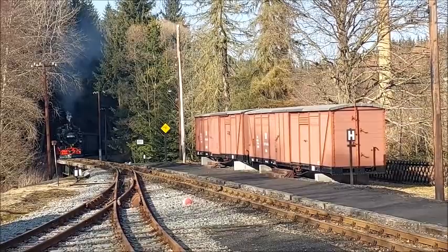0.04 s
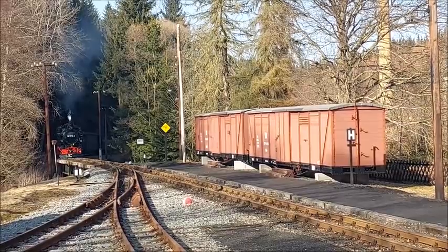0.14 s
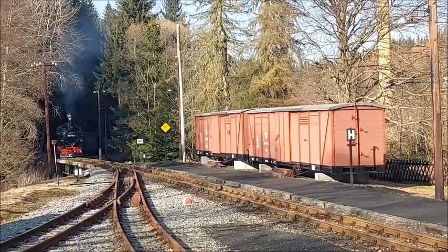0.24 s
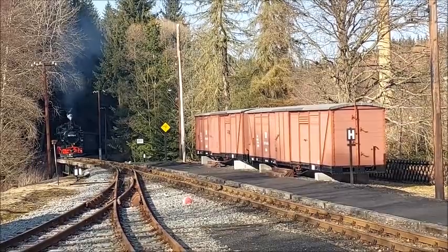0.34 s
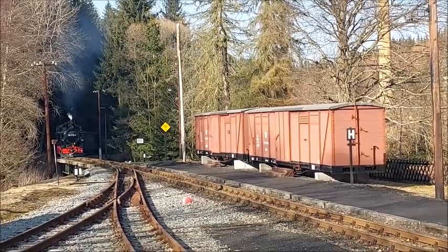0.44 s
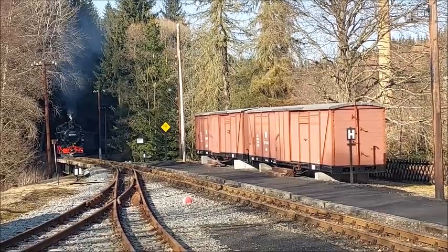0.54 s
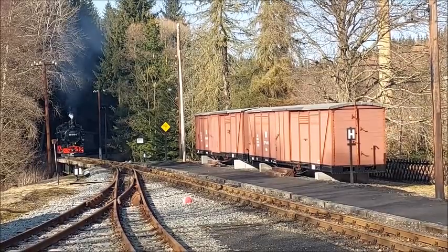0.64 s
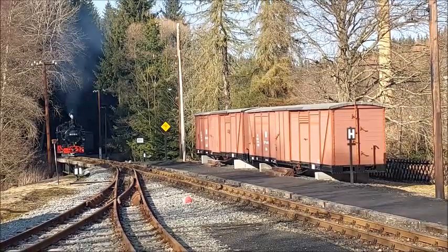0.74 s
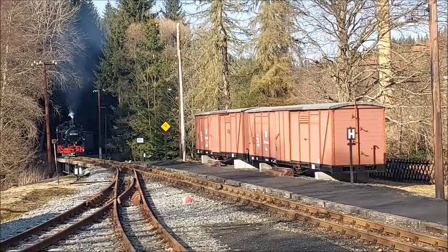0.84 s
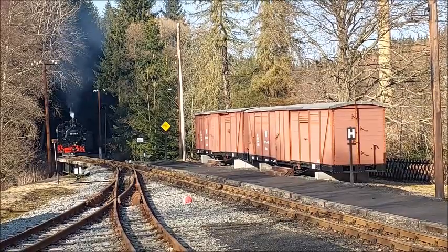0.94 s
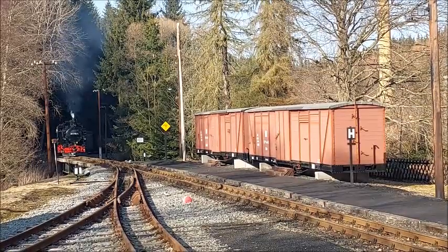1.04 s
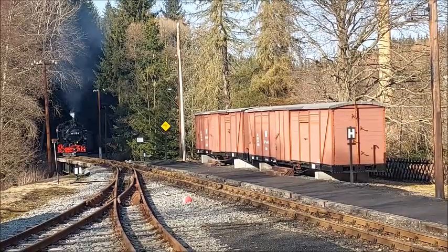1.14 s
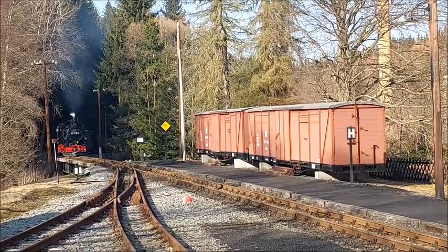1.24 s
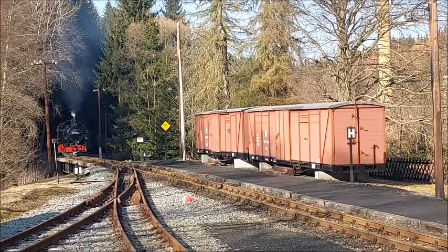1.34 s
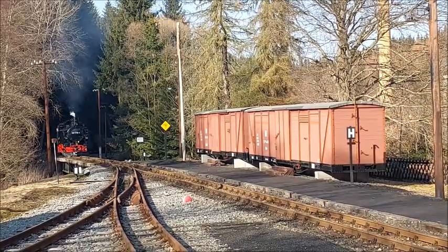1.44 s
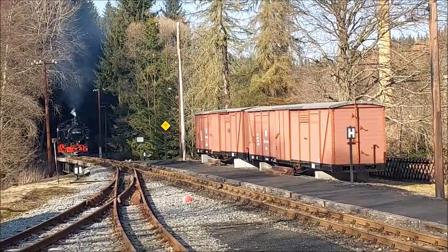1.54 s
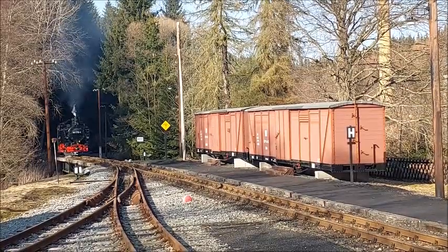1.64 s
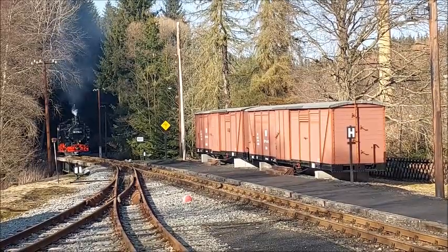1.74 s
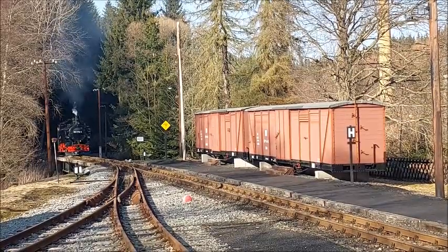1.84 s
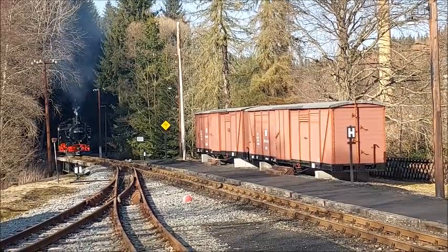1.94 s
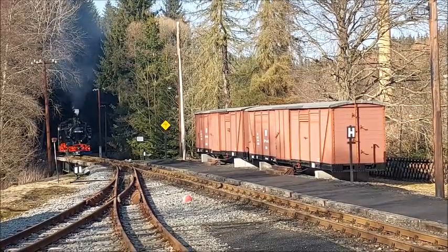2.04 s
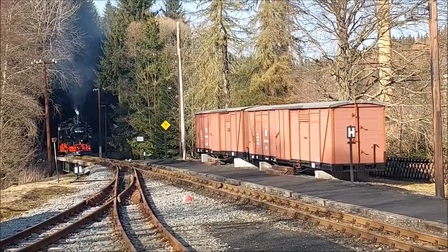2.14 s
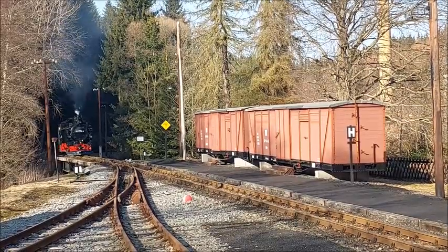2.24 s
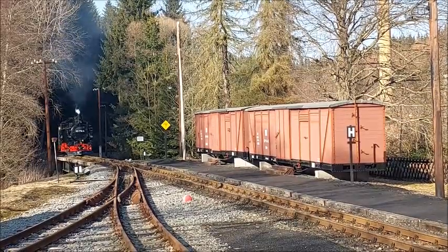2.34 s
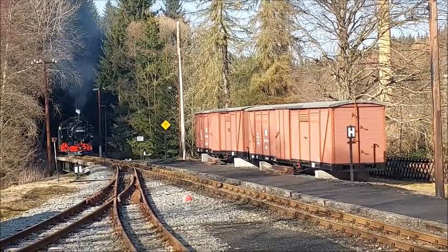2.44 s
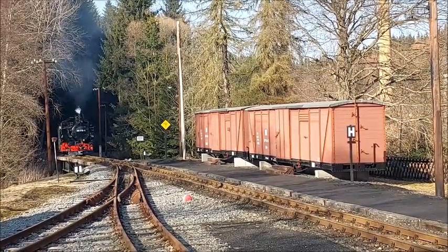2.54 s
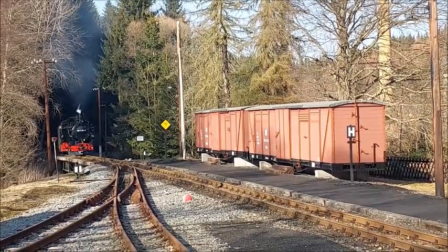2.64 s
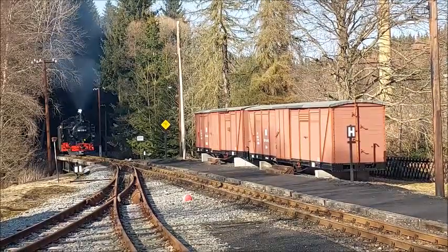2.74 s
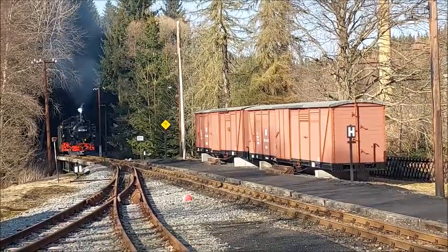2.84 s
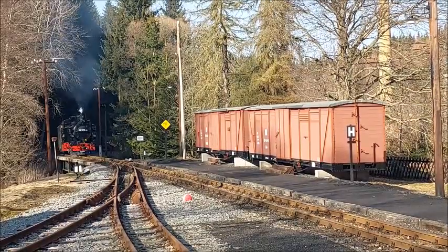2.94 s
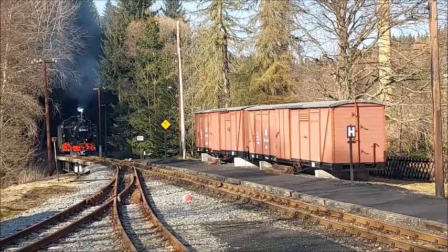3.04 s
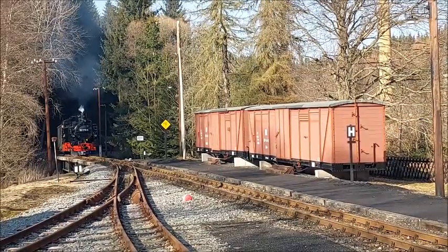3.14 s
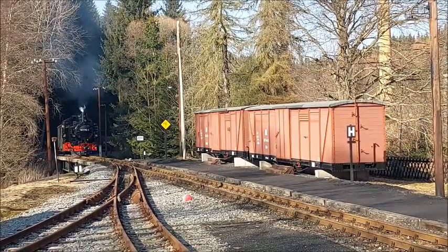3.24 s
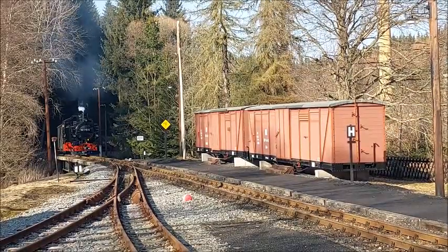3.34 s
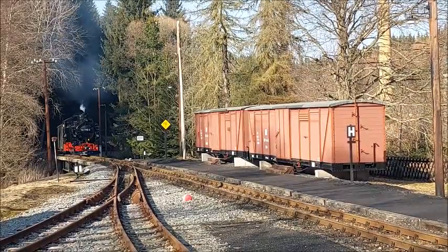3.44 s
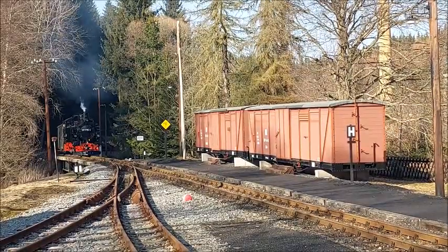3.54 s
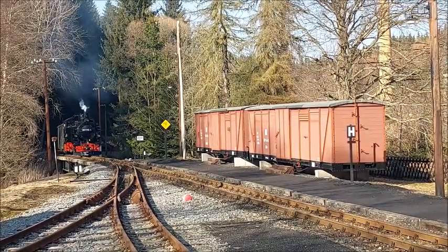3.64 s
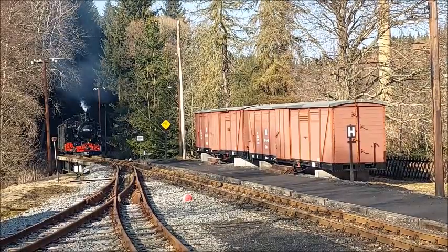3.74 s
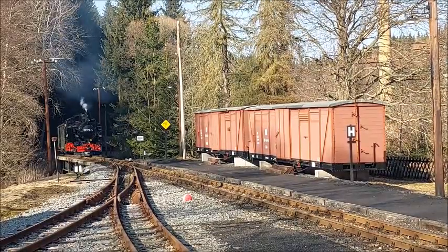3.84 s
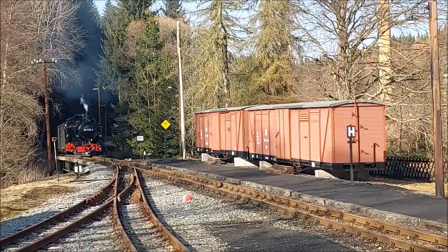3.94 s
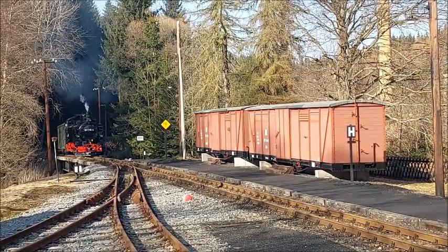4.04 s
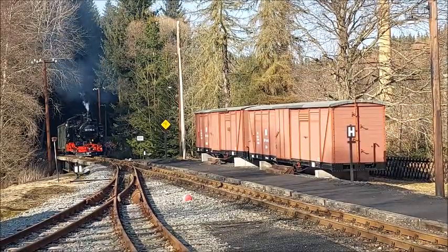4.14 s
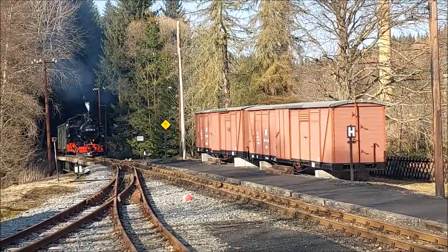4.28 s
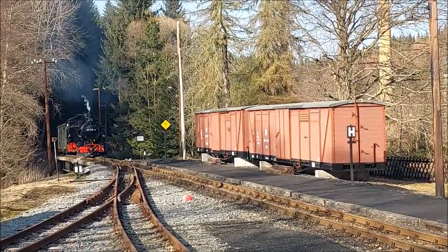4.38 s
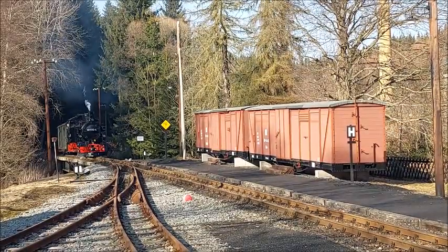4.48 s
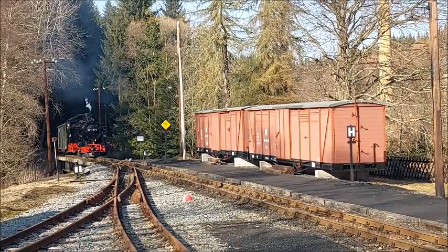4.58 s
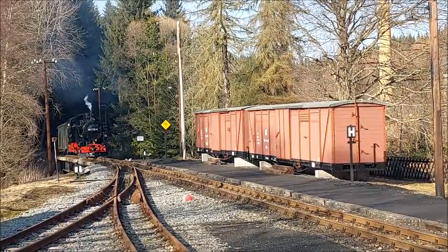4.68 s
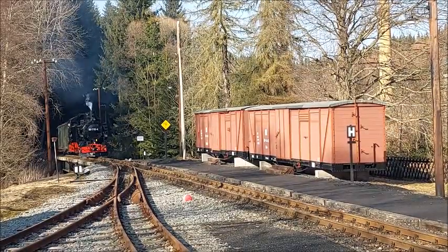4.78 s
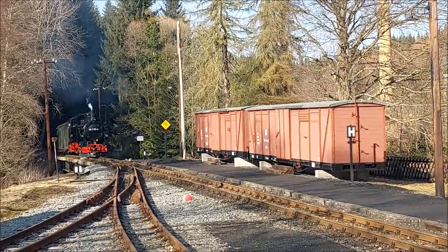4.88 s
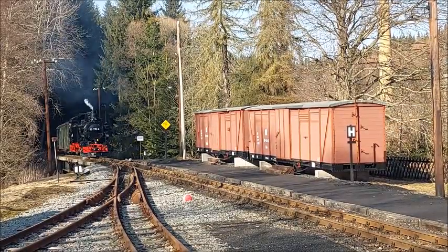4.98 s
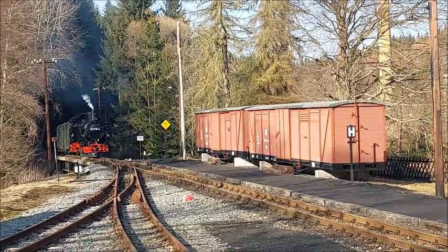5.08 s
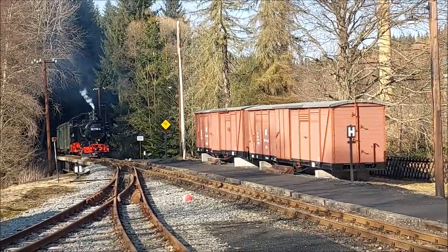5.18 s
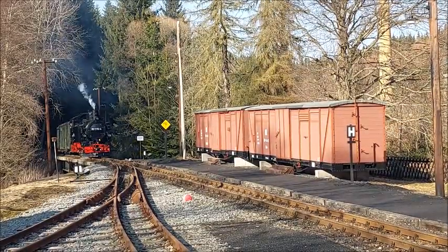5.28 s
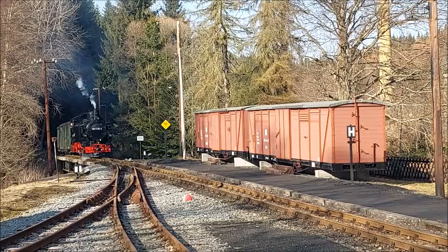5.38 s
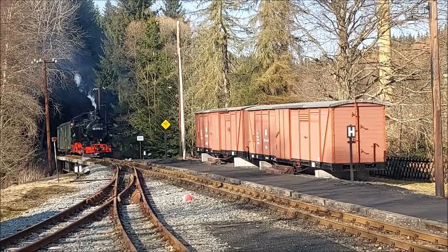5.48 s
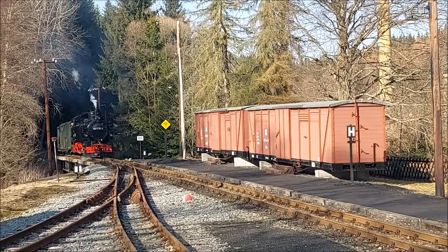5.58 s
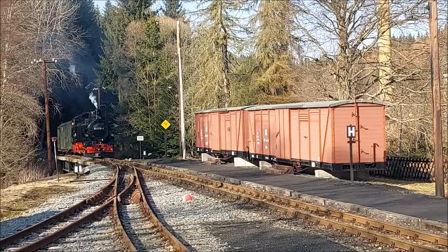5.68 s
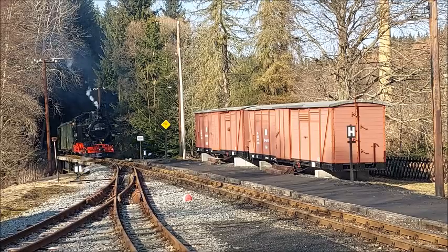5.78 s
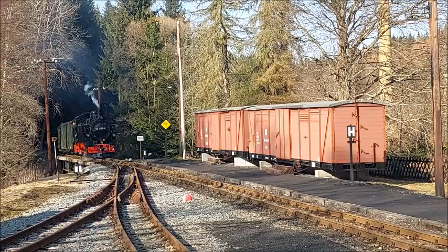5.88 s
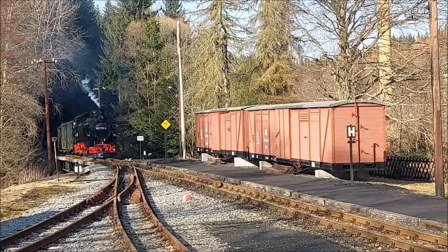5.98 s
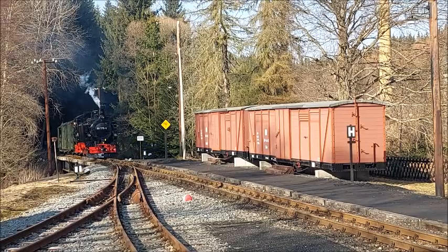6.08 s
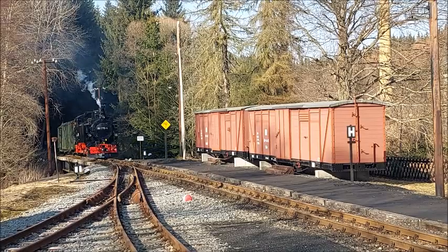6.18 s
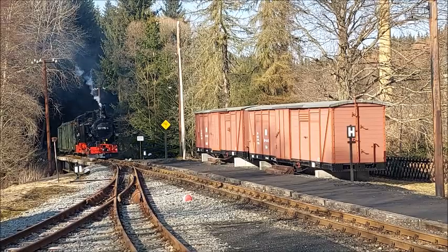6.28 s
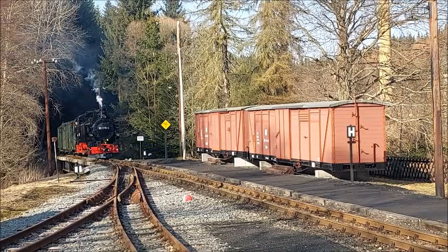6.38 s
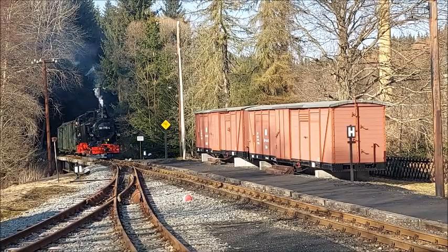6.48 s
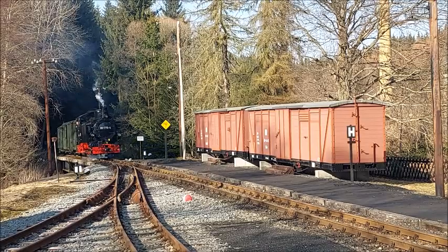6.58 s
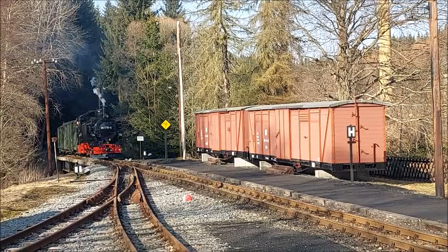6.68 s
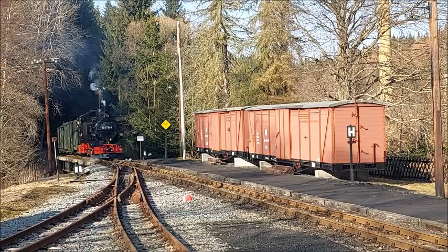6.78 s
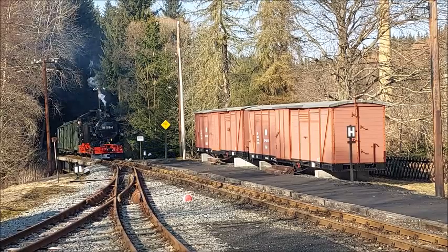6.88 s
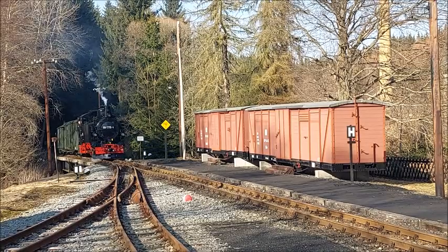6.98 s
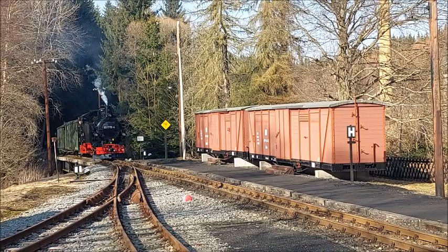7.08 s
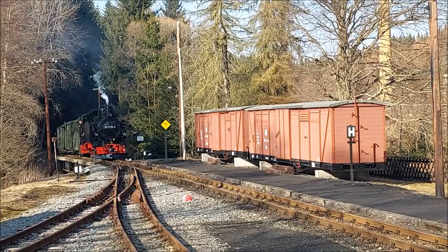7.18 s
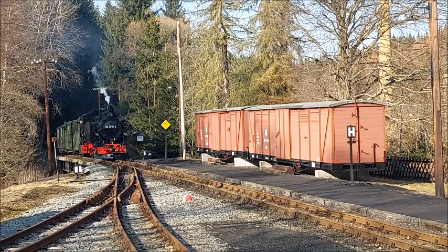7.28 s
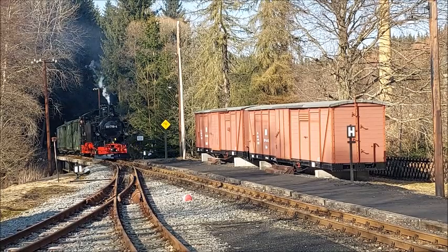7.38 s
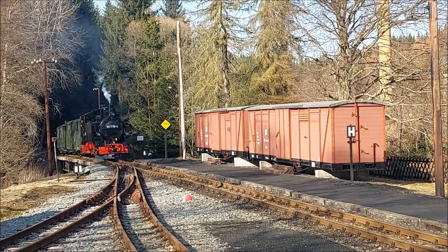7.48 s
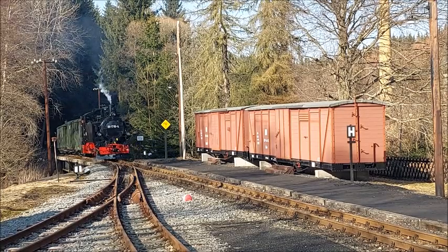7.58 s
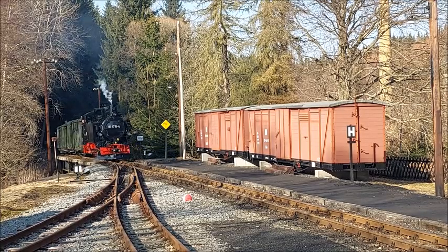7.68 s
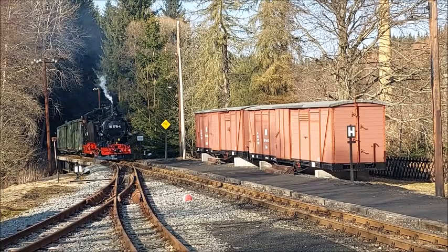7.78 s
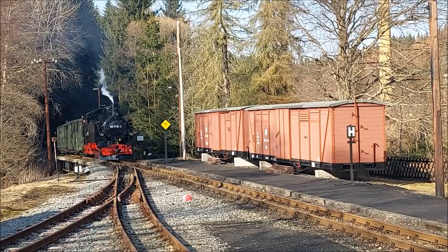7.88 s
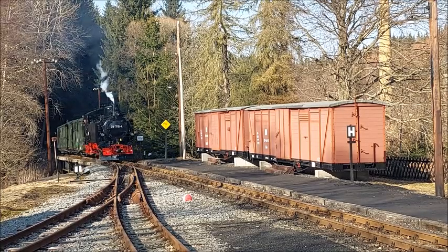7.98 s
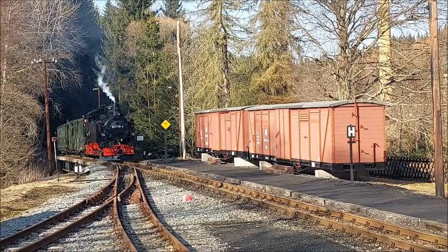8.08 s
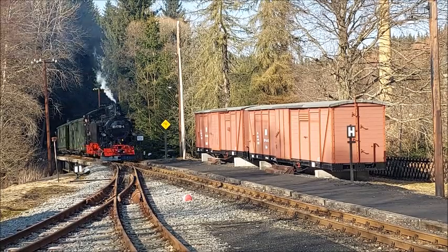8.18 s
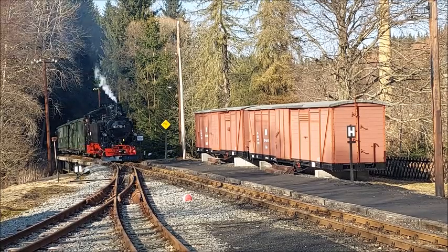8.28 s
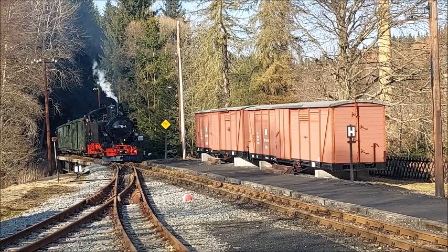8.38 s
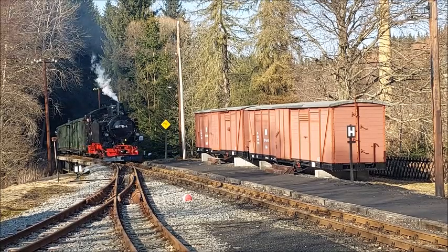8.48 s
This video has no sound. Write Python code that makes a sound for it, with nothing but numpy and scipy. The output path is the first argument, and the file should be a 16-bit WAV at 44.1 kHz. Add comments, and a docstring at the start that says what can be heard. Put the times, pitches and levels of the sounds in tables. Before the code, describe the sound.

Outdoors by a forest railway, a distant steam locomotive comes nearer, puffing a little over six beats a second. Soft, raspy chuffs gain body and boom, echoing dully off trees above a low rolling rumble and faint steam hiss. Close to the stereo microphone, a camera shutter fires three brief bursts, coupling gear knocks once, and late wind buffets thump.

```python
"""A steam locomotive works its way closer through a forest, a little over six exhaust beats a second.
Each beat is enveloped noise: a thump, a booming chimney, a rasp and a hiss; all but the hiss echo off the trees.
Beneath it the train rumbles, rolls and leaks steam as noise, and the engine drones in low sine partials.
Close by, a camera shutter fires in short bursts of tiny noise clicks, and coupling gear knocks once in damped sines.
Wind buffets thud on the microphone as low noise, and two faint rustles crackle near it."""
import sys
import numpy as np
from scipy import signal
from scipy.fft import rfft, irfft, next_fast_len
from scipy.io import wavfile
from scipy.ndimage import uniform_filter1d

SR = 44100
rng = np.random.default_rng(int(sys.argv[2]) if len(sys.argv) > 2 else 0)


def transcribe(signal):
    """Save signal, clipped to [-1, 1], as a 16-bit WAV file at the path in sys.argv[1]."""
    frames = np.atleast_2d(signal).T
    limited = np.clip(frames, -1, 1)
    pcm = np.round(limited * 32767).astype(np.int16)
    wavfile.write(sys.argv[1], SR, pcm)


N = 375732
TIME = np.arange(N) / SR
SIZE = next_fast_len(N, real=True)
FREQ = np.maximum(np.fft.rfftfreq(SIZE, 1 / SR), 1)

# Four exhaust beats to a turn of the driving wheels; the engine slows over the first turns, then holds its pace.
BEAT_COUNT = 54
FIRST_BEAT_S, TURN_S, FIRST_TURN_SHORTER_S, SLOWING_TURNS = 0.0852, 0.6337, 0.0303, 5
BEAT_SCATTER_DB, LENGTH_SCATTER = 0.65, 0.09  # chance from beat to beat
# Unevenly set valves, so every turn limps alike.
# Each row: lateness in seconds, boom offset in dB, rasp offset in dB, relative length.
VALVE_BEATS = [(-0.0002, 0.26, 0.37, 1.38), (0.0027, 0.05, 0.5, 1.42), (-0.0064, -1.5, -0.5, 1.22),
               (-0.0023, 0.7, -0.6, 1.16)]
# Strength of the blast as the engine works closer, before each layer's trim.
# Each row: time in seconds, boom level in dB, rasp level in dB.
BLAST = [(0.1, -40.5, -38.5), (0.85, -36, -33.5), (1.5, -30.5, -32.5), (1.999, -28, -31), (2.9, -30, -31.5),
         (3.45, -28, -32.5), (4.3, -26, -30.5), (5.9, -26.5, -31), (6.3, -22.5, -31.2), (7.1, -24.3, -31.5),
         (7.65, -20, -29.8), (8.0, -23, -31), (8.42, -21, -31)]
# Single beats that stand out. Each row: time in seconds, extra boom in dB, extra rasp in dB.
ACCENTS = [(0.537, 5, 0), (2.227, 1, 1.5), (4.445, -0.5, 1), (4.605, -1.5, 1), (5.077, -1.5, 3),
           (7.451, 0.5, 0), (8.41, 2.5, 2)]
# Spectra of the four layers of a beat. Each row: frequency in Hz, relative level per Hz in dB.
THUMP_COLOUR = [(25, -18), (45, -4), (68, 5), (95, 2), (130, -2), (155, -12), (180, -16), (215, 3.5),
                (280, -48)]
BOOM_COLOUR = [(35, -30), (65, -9.5), (125, -6), (165, -15), (215, -1), (310, -2), (450, -4), (560, -13.5),
               (800, -31)]
RASP_COLOUR = [(250, -13), (500, 3.5), (620, 4), (850, -2.5), (1050, -5.5), (1400, -13), (1550, -13.5),
               (2100, -14.5), (2400, -19.5), (2800, -21), (3200, -26), (5000, -30), (9000, -52)]
HISS_COLOUR = [(1800, -32), (3500, 4.5), (5000, 0), (7000, 3.5), (8400, -2), (9600, 1), (12500, 3),
               (15500, 0.5)]
# Resonances of chimney and smokebox. Each row: centre in Hz, width in Hz, lift in dB.
CHIMNEY = [(213, 4.7, 4), (242.7, 31, 6.5), (330, 8.9, 0), (374.6, 20.6, 5.5), (432, 19, 7.5),
           (1183, 15, 5.5), (1376, 71, 7.5), (1665, 6.7, 7.5), (1885, 59, 2)]
# Thump against the boom's strength. Each row: time in seconds, relative level in dB.
THUMP_LEVEL = [(0, -11), (2, -14), (4.2, -11), (5.4, -6), (6.5, -3.5), (7.4, -10), (8.52, -10)]
# Hiss against the rasp's strength, before trims. Each row: time in seconds, relative level in dB.
HISS_LEVEL = [(0, -20), (2, -26.5), (4.2, -25.5), (4.65, -19.5), (6.6, -20), (7.4, -22.5), (8.52, -20.5)]
# The rasp turns brighter for a few beats. One row: middle in seconds, half length in seconds, lift in dB.
BRIGHT_SPELL = (5.39, 0.21, 4.1)
START_DISTANCE_M, SPEED_M_PER_S = 130, 11
# Reflections close to the direct path, from ballast and bank.
# Each row: delay in seconds, share of the direct sound, wander of the delay in seconds.
GLANCES = [(.0009, 0.31, 0.00025), (.0042, 0.38, 0.001224)]

# Echoes from wagons and forest edge, before the treble cut. Each row: delay in seconds, level in dB.
ECHOES = [(.036, -15.5), (.062, -27), (.093, -24.5)]
FOREST_T60_S, FOREST_DB, FOREST_CUT_HZ = 0.94, -11.5, 620  # wash level is before the cut

# The rolling train, before each layer's trim.
# Each row: time in seconds, rumble level in dB, rolling noise level in dB, steam leak level in dB.
TRAIN = [(0.0, -51.5, -46.5, -64.5), (0.69, -45.5, -38.5, -57), (1.68, -43.5, -38.5, -60.5),
         (3.8, -40.5, -37.5, -59), (5.41, -37, -37, -61), (7.24, -38, -37.5, -59), (8.52, -37.5, -37, -57)]
# Spectra of the train's three layers. Each row: frequency in Hz, relative level per Hz in dB.
RUMBLE_COLOUR = [(18, -19), (30, -4), (45, -4.5), (62, 5), (90, 4), (125, 4.5), (145, -4), (175, -2.5),
                 (300, -60)]
ROLLING_COLOUR = [(100, -8), (170, -14.5), (245, 0), (420, -3), (520, -10), (800, -12), (1300, -21),
                  (1900, -17), (2700, -27.5), (5000, -36.5)]
LEAK_COLOUR = [(1200, 12), (2200, 7), (3200, 7.5), (4800, 6.5), (6500, 1), (8400, -5), (9700, -2.5),
               (12300, 1.5), (15500, -3)]

# Low drone from the engine. Each row: time in seconds, level in dB.
DRONE_LEVEL = [(0, -64), (1.2, -43), (3.1, -34.5), (3.9, -38.5), (5.2, -36.5), (6.5, -56), (8.52, -48)]
# Harmonics of the drone's cycle. Each row: multiple of the cycle rate, relative level in dB.
DRONE_PARTIALS = [(4, -7.5), (5, -3), (6, -4.5), (7, -8.5)]
DRONE_HZ = 20.55  # middle of the wandering cycle rate

# Bursts of the camera. Each row: start in seconds, number of exposures, relative level in dB.
BURSTS = [(0.092, 2, -3.5), (2.592, 3, 0), (4.652, 4, -1)]
EXPOSURE_GAP_S = 0.2007
# Contacts within an exposure, before the burst's level.
# Each row: seconds after its start, bright snap in dB, ring of the body in dB, decay constant in seconds.
SHUTTER = [(-.013, -49.5, -48, 0.0047), (-.001, -43.5, -39, .003), (.004, -61, -46.5, 0.0034),
           (0.044, -40.5, -54, 0.0054), (.074, -46.5, -50.5, 0.011)]
# Spectra of snap and ring. Each row: frequency in Hz, relative level per Hz in dB.
SNAP_COLOUR = [(1500, -12), (4500, 6), (5500, 9.5), (6500, -1.5), (11500, 3.5), (15500, 1)]
CAMERA_BODY_COLOUR = [(2000, -50), (3200, -5), (3850, 5), (4900, -6), (5600, -20), (9000, -34)]

KNOCK_S = 6.4416
# Modes of the knocking coupling gear. Each row: frequency in Hz, level in dB, 60 dB decay time in seconds.
KNOCK_MODES = [(880, -29, .025), (1090, -26, .022), (1380, -29, .02)]
# Spectrum of the scrape around the knock. Each row: frequency in Hz, relative level per Hz in dB.
SCRAPE_COLOUR = [(700, 1), (1200, 2), (2200, -14), (5200, -14), (9000, -25), (15000, -21)]

# Wind buffets. Each row: peak time in seconds, level in dB, half length in seconds.
BUFFETS = [(4.474, -29.5, 0.035), (5.397, -30, 0.01), (6.212, -46, .02), (6.75, -33, 0.024),
           (7.188, -17, 0.0097), (7.279, -27, 0.025)]
# Spectrum of wind on the microphone. Each row: frequency in Hz, relative level per Hz in dB.
EDDY_COLOUR = [(30, -13), (70, 8.5), (170, 4.5), (300, -35)]

# Faint dry rustles near the microphone. Each row: start in seconds, length in seconds, level in dB.
RUSTLES = [(0.15, 0.25, -62), (0.548, 0.8, -60.5)]
RUSTLE_ATTACK_S, RUSTLE_SAG_DB_PER_S, RUSTLE_RELEASE_S = 0.04, 12, 0.15

PORT_SPACING_S, LEFT_LEAD_S = 0.0005, 0.000085  # microphone ports, as travel times
CUTOFF_HZ = 15800


def exhaust():
    """The turbulent jet rasps and hisses; the slug of steam thumps, and the chimney booms and rings on."""
    rows = chuffs()
    _, boom_db, rasp_db, _ = rows.T
    thump_db, = in_time(THUMP_LEVEL)
    hiss_db, = in_time(HISS_LEVEL)
    distance_m = START_DISTANCE_M - SPEED_M_PER_S * TIME

    thump = evened(air_noise(colour(THUMP_COLOUR), scattered=0.72), window_s=0.039) * from_db(thump_db)
    thump *= beats(rows, boom_db, lag_s=-0.0011, rise_s=0.012, fall_s=0.039, linger_db=-47, linger_s=0.08)

    boom = evened(air_noise(colour(BOOM_COLOUR, CHIMNEY), scattered=0.097), window_s=0.028)
    boom *= beats(rows, boom_db + 0.5, lag_s=0.0061, rise_s=0.023, fall_s=0.023, linger_db=-55, linger_s=0.08)

    rasp = evened(air_noise(colour(RASP_COLOUR, CHIMNEY), scattered=0.29), window_s=0.031)
    rasp *= from_db(1.23 * drift(170))  # rough flutter
    rasp *= beats(rows, rasp_db + 2.0, lag_s=0, rise_s=0.02, fall_s=0.018, linger_db=-27.5, linger_s=0.12)
    rasp = along_the_line(rasp, distance_m, loss_db_per_m=0.0882)

    hiss = air_noise(colour(HISS_COLOUR), scattered=0.96) * from_db(hiss_db + 0.8 * drift(120))
    hiss *= beats(rows, rasp_db - 1.5, lag_s=-0.004, rise_s=0.025, fall_s=0.047, linger_db=-23.0, linger_s=0.08)
    return thump + boom + rasp, hiss


def chuffs():
    """The wheels time the beats; each row: crest in seconds before lags, boom dB, rasp dB, relative length."""
    beat = np.arange(BEAT_COUNT)
    turns = beat / len(VALVE_BEATS)
    late_s, boom_db, rasp_db, length = np.array(VALVE_BEATS)[beat % len(VALVE_BEATS)].T
    slowing = np.minimum(turns, SLOWING_TURNS)
    gained_s = FIRST_TURN_SHORTER_S * (slowing - slowing ** 2 / (2 * SLOWING_TURNS))
    s = FIRST_BEAT_S + TURN_S * turns - gained_s + late_s

    blast_s, blast_boom_db, blast_rasp_db = np.transpose(BLAST)
    boom_luck, rasp_luck, length_luck = rng.standard_normal((BEAT_COUNT, 3)).T
    boom_db = boom_db + np.interp(s, blast_s, blast_boom_db) + BEAT_SCATTER_DB * boom_luck
    rasp_db = rasp_db + np.interp(s, blast_s, blast_rasp_db) + BEAT_SCATTER_DB * rasp_luck
    for accent_s, more_boom_db, more_rasp_db in ACCENTS:
        nearest = np.argmin(np.abs(s - accent_s))
        boom_db[nearest] += more_boom_db
        rasp_db[nearest] += more_rasp_db
    return np.transpose([s, boom_db, rasp_db, length * np.exp(LENGTH_SCATTER * length_luck)])


def beats(rows, levels_db, lag_s, rise_s, fall_s, linger_db, linger_s):
    """The exhaust port opens, the cylinder blows down quickly, and the piston pushes out the rest."""
    power = np.zeros(N)
    for (s, *_, length), db in zip(rows, levels_db):
        near = slice(max(int((s - 0.1) * SR), 0), int((s + 0.3) * SR))
        t = TIME[near] - s - lag_s
        after = np.maximum(t, 0)
        opening = np.exp(-(np.minimum(t, 0) / rise_s) ** 2 / length)
        blowdown = np.exp(-after / (fall_s * length))
        pushed_out = from_db(linger_db) * np.exp(-after / linger_s)
        power[near] += (from_db(db) * opening * (blowdown + pushed_out)) ** 2
    return np.sqrt(power)


def along_the_line(x, distance_m, loss_db_per_m):
    """Wandering glancing reflections colour each beat anew; treble is lost with distance."""
    out = x
    for delay_s, share, wander_s in GLANCES:
        late = TIME - np.abs(delay_s + wander_s * drift(1.514))
        out = out + share * np.array([np.interp(late, TIME, channel) for channel in x])
    mellow = signal.sosfiltfilt(signal.butter(2, 1400, fs=SR, output="sos"), out)
    middle_s, half_s, bright_db = BRIGHT_SPELL
    spell_db = bright_db * np.exp(-((TIME - middle_s) / half_s) ** 2)
    air_loss_db = loss_db_per_m * (distance_m - np.mean(distance_m))  # against the mean distance
    return mellow + (out - mellow) * from_db(spell_db - air_loss_db)


def forest(x):
    """A few distinct echoes, and the dull wash scattered by the trunks."""
    t = TIME[:SR]
    wash = rng.standard_normal((3, SR)) * from_db(-60 * t / FOREST_T60_S) * (1 - np.exp(-t / 0.051))
    wash = wash[:2] * 1.1 + wash[2]  # the two sides share part of the wash
    response = from_db(FOREST_DB) * wash / np.sqrt(np.sum(wash ** 2) / 2)
    for delay_s, db in ECHOES:
        response[:, int(delay_s * SR)] += from_db(db)
    response = signal.sosfilt(signal.butter(1, FOREST_CUT_HZ, fs=SR, output="sos"), response)
    return signal.fftconvolve(x, response, axes=1)[:, :N]


def train():
    """Wheels rumble unevenly and roll on the rails, and steam leaks with a slight flutter."""
    rumble_db, rolling_db, leak_db = in_time(TRAIN)
    lumps_db = 4.0 * np.minimum(drift(24), 1.2)
    rumble = evened(air_noise(colour(RUMBLE_COLOUR), scattered=1.0), window_s=0.1)
    rumble = rumble * from_db(rumble_db + 0.5 + lumps_db)
    rolling = air_noise(colour(ROLLING_COLOUR, CHIMNEY), scattered=0.89)
    rolling = rolling * from_db(rolling_db - 3.0 + 2.5 * drift(37))
    leak = air_noise(colour(LEAK_COLOUR), scattered=0.93)
    leak = leak * from_db(leak_db + 3.5 + 0.8 * drift(90))
    return rumble + rolling + leak


def drone():
    """Low partials of one wandering cycle, each wavering in strength."""
    level_db, = in_time(DRONE_LEVEL)
    phase = 2 * np.pi * np.cumsum(DRONE_HZ * (1 + 0.02215 * drift(3.86))) / SR
    tone = np.zeros(N)
    for multiple, db in DRONE_PARTIALS:
        strength = from_db(db + 1.64 * drift(7.6))
        tone += strength * np.sin(round(multiple) * phase + rng.uniform(0, 2 * np.pi))
    return from_db(level_db) * rms_one(tone)


def camera():
    """Mirror and curtains make the same run of tiny contacts at each exposure."""
    snap, body = np.zeros((2, N))
    t = TIME[:SR // 10]
    exposures = [(s + k * EXPOSURE_GAP_S, db) for s, count, db in BURSTS for k in range(round(count))]
    for start, level_db in exposures:
        for delay, snap_db, body_db, decay in SHUTTER:
            at = int((start + delay) * SR)
            fade = from_db(level_db) * np.exp(-t / decay) * (1 - np.exp(-t / 0.00013))
            snap[at:at + len(t)] += from_db(snap_db) * fade
            body[at:at + len(t)] += from_db(body_db) * fade
    snaps = snap * air_noise(colour(SNAP_COLOUR), scattered=1.0)
    rings = body * air_noise(colour(CAMERA_BODY_COLOUR), scattered=0.83)
    return snaps + rings


def knock():
    """Coupling gear gives a short scrape with one blow at its height, ringing in damped modes."""
    t = np.maximum(TIME - KNOCK_S, 0)
    blow = np.zeros(N)
    for hz, db, t60 in KNOCK_MODES:
        blow += from_db(db - 60 * np.minimum(t / t60, 10)) * np.sin(2 * np.pi * hz * t)
    swell = from_db(-39.5) * np.exp(-((TIME - KNOCK_S) / 0.019) ** 2)
    return blow + swell * air_noise(colour(SCRAPE_COLOUR), scattered=1.0)


def wind():
    """Single eddies thud on the microphone as swells of low noise."""
    push = sum(from_db(db) * np.exp(-((TIME - s) / half_s) ** 2) for s, db, half_s in BUFFETS)
    return push * evened(air_noise(colour(EDDY_COLOUR), scattered=1.0), window_s=0.028)


def rustle():
    """Tiny crackles come in clumps; each rustle starts quickly, sags and dies away."""
    crackle = rms_one(from_db(9.5 * np.minimum(drift(120), 2.6)))
    level = 0
    for s, length, db in RUSTLES:
        t = TIME - s
        edges = np.exp(np.minimum(t, 0) / RUSTLE_ATTACK_S - np.maximum(t - length, 0) / RUSTLE_RELEASE_S)
        level = level + from_db(db - RUSTLE_SAG_DB_PER_S * np.maximum(t, 0)) * edges
    return level * crackle * air_noise(colour(HISS_COLOUR), scattered=0.69)


def air_noise(gain, scattered):
    """Noise at two microphone ports: part straight from the track on the left, part from all around."""
    direct, mid, side = rfft(rng.standard_normal((3, SIZE)))
    share = np.clip(scattered, 0, 1)
    # scattered sound is alike at both ports in the bass and less so higher up
    alike = np.clip(0.89 * np.sinc(2 * FREQ * PORT_SPACING_S), -1, 1)
    sides = np.array([[1], [-1]])
    around = np.sqrt((1 + alike) / 2) * mid + np.sqrt((1 - alike) / 2) * side * sides
    ahead = direct * np.exp(1j * np.pi * FREQ * LEFT_LEAD_S * sides)
    spectrum = gain * (np.sqrt(1 - share) * ahead + np.sqrt(share) * around)
    return rms_one(irfft(spectrum)[:, :N])


def evened(noise, window_s):
    """Noise held to a steady power, so that the pressure behind it sets its strength."""
    window = max(int(window_s * SR), 2)
    return noise / np.sqrt(uniform_filter1d(np.mean(noise ** 2, axis=0), window) + 1e-6)


def colour(points, resonances=()):
    """Gain at each frequency: a broad shape with closed ends, lifted at the resonances."""
    hz, db = np.transpose(points)
    shape = np.interp(np.log(FREQ), np.log(hz), db)
    lift = sum(top / (1 + (2 * (FREQ - centre) / width) ** 2) for centre, width, top in resonances)
    closed_ends = np.minimum(1, np.minimum(FREQ / hz[0], hz[-1] / FREQ)) ** 2
    return from_db(shape + lift) * closed_ends


def drift(rate_hz):
    """Random wander of spread 1, mostly slower than the rate, drawn at every 32nd sample."""
    step = 32
    count = N // step + 2
    hz = np.fft.rfftfreq(count, step / SR)
    slow = irfft(rfft(rng.standard_normal(count)) / (1 + (hz / rate_hz) ** 2) ** 2, count)
    return np.interp(np.arange(N) / step, np.arange(count), rms_one(slow))


def in_time(rows):
    """Each column of a curve, sample by sample."""
    s, *columns = np.transpose(rows)
    return [np.interp(TIME, s, column) for column in columns]


def from_db(db):
    """Decibels to gain."""
    return 10 ** (np.asarray(db) / 20)


def rms_one(x):
    """Scale to unit power."""
    return x / np.sqrt(np.mean(x ** 2) + 1e-20)


def scene():
    """The locomotive with its echoes, and the small sounds near the microphone."""
    blast, hiss = exhaust()
    engine = blast + hiss + forest(blast) + train() + drone()
    return engine + camera() + knock() + wind() + rustle()


def record(dry):
    """The deepest bass is rolled off and the top is cut steeply."""
    dry = signal.sosfilt(signal.butter(2, 30, "high", fs=SR, output="sos"), dry)
    return signal.sosfilt(signal.ellip(12, 0.1, 90, CUTOFF_HZ, fs=SR, output="sos"), dry)


dry = scene()
out = record(dry)
transcribe(out)
```